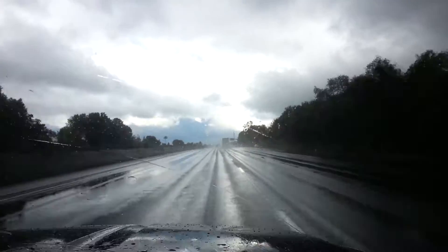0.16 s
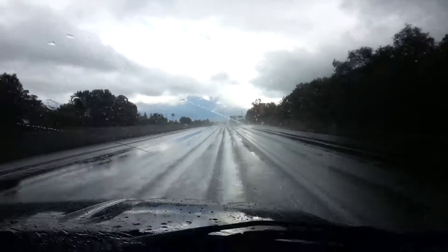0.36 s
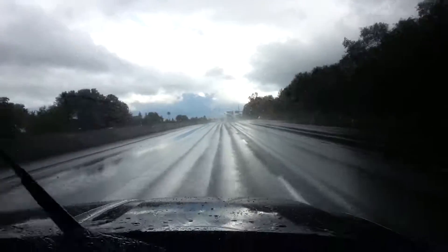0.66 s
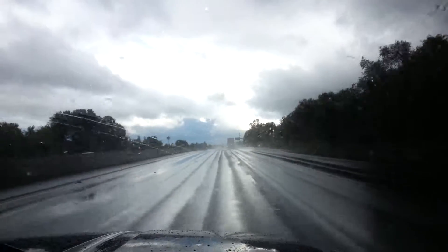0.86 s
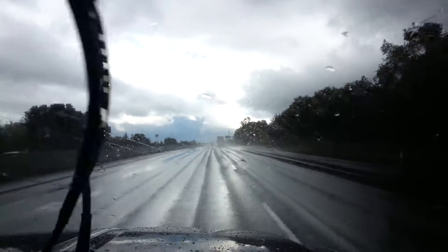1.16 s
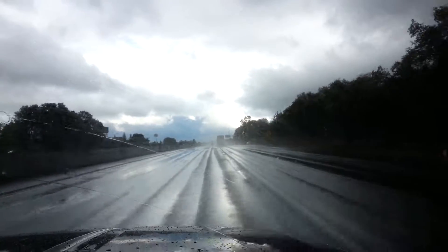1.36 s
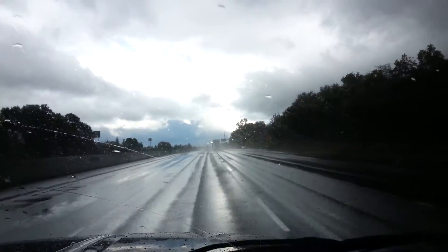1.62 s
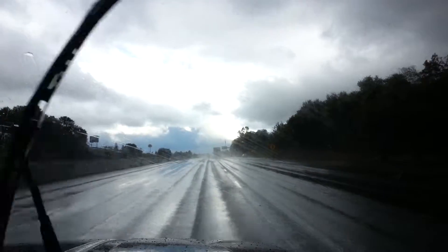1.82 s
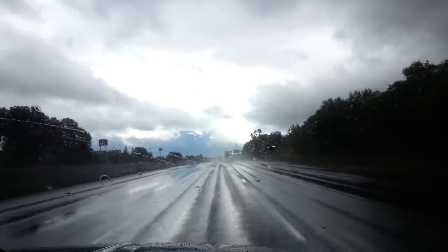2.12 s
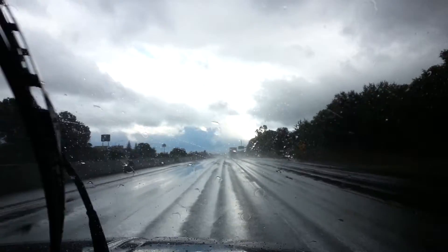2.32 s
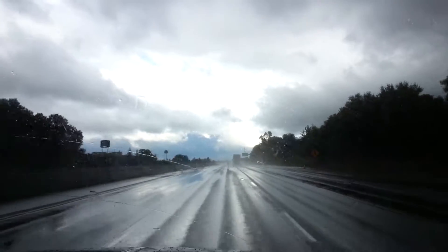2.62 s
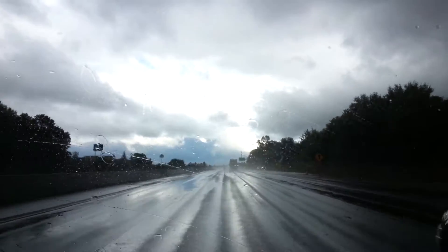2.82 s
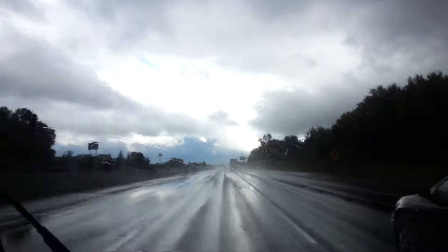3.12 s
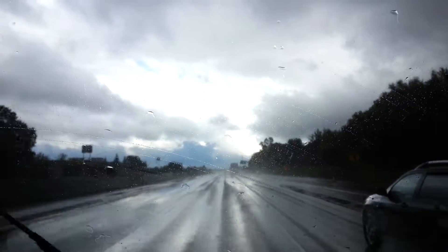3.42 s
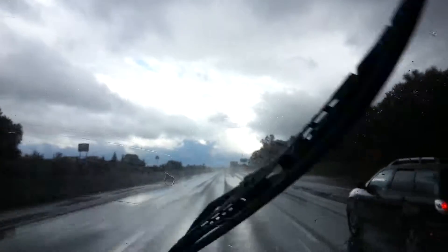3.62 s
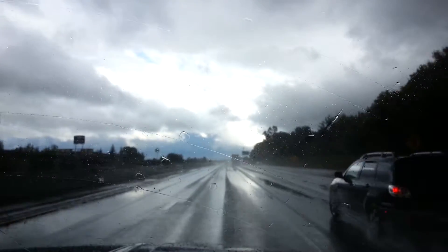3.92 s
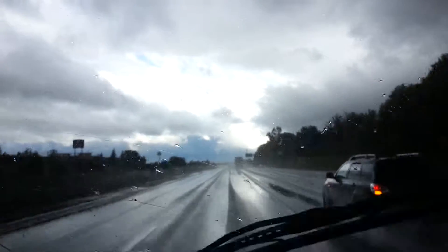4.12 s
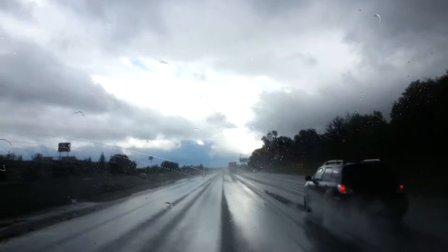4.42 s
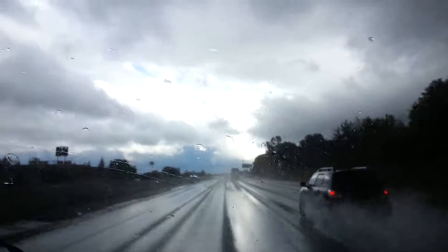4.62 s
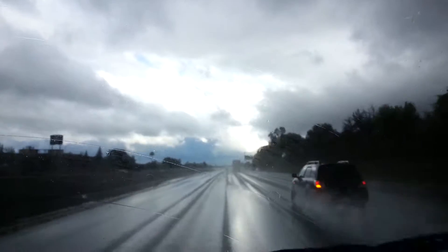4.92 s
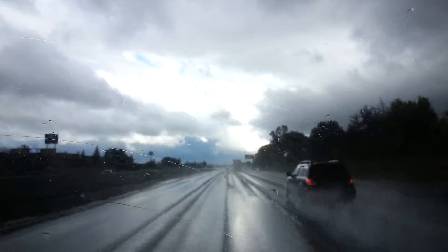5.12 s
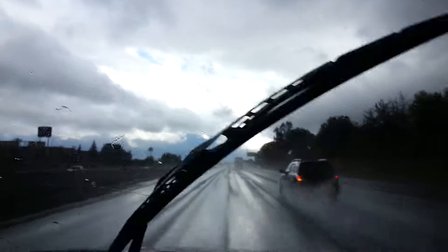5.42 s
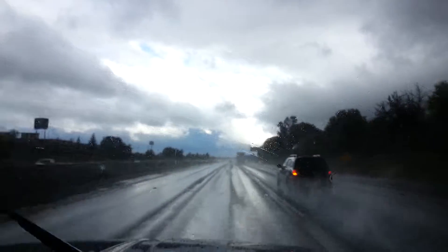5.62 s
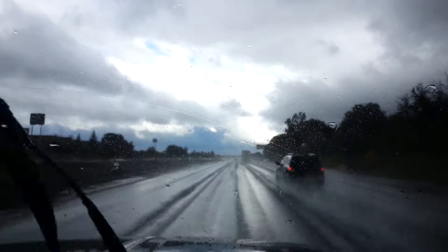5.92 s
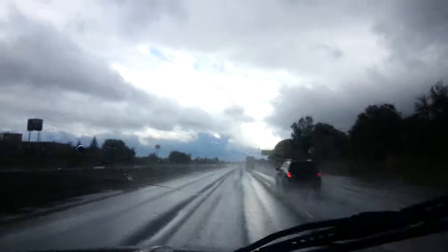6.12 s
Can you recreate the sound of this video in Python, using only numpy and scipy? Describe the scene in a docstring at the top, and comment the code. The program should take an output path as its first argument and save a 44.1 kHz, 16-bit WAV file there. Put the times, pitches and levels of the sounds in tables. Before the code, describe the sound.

A stereo microphone inside a truck cab faces the windshield at steady highway speed. Throughout, a low wet-road rumble, watery tyre wash and soft low engine hum roll evenly, swelling briefly near 1.4 and more gently around 2 and 4.2 seconds. Dense crisp rain patters on the glass with fine spray hiss, gusty during the first 2.5 seconds, then gradually easing, with a slight revival near 5.9. Faint high ticks sparkle above. Fat drops crack sharply, mostly left of centre, at scattered moments, the loudest at 5.2, another at 5.3. Wipers drag, flop and thud hollowly near 1.0, 2.2, 2.8, 3.4, 4.7, 5.3 and strongest at 5.9, shaking cowl and dashboard. A breathy tyre drone, clearest around 2 seconds and again near 3.9, glides slowly downward as a car draws past, fading under the roar until the end at about 6.3.

```python
"""Rain pelts the windshield of a truck cab at highway speed: dense patter shaped by the glass, over spray hiss.
Fat drops crack (noise snap plus ringing pane modes); sparse faint noise grains lie at 9.5 to 14.6 kHz.
Wipers thud at each turn: noise bursts slap the glass and ring the cowl and dashboard.
Behind: wet-road roar (coloured noise), a gliding tyre drone (narrow noise band), engine hum (sines)."""
import sys
import numpy as np
from scipy import signal
from scipy.fft import rfft, irfft, next_fast_len
from scipy.io import wavfile
from scipy.ndimage import uniform_filter1d

SR = 44100
rng = np.random.default_rng(int(sys.argv[2]) if len(sys.argv) > 2 else 0)


def store_pcm(level_fs):
    """Save levels as 16-bit WAV."""
    pcm = np.round(np.clip(level_fs, -1, 1) * 32767).astype(np.int16)
    wavfile.write(sys.argv[1], SR, np.atleast_2d(pcm).T)


N = 276066
TIME_S = np.arange(N) / SR
CUTOFF_HZ = 14600
ENGINE_FIRING_HZ = 112.24
RUMBLE_DB, WASH_DB = -23.5, -27
# wetter road, louder tyres: dB of roar per dB of rain
RUMBLE_DB_PER_RAIN_DB, WASH_DB_PER_RAIN_DB = 0.078, 0.013

# engine orders: multiple of firing rate, rms level/dB
ENGINE_ORDERS = [(1, -35), (2, -30), (3, -34)]
# roar swells over some stretches of road: centre t/s, half-length/s, rise/dB
ROAD_SWELLS = [(0.55, 0.19, 0.5), (1.364, 0.056, 3.5), (2.034, 0.45, 1.5), (2.725, 0.085, 0.3),
               (4.15, 0.15, 1.0), (5.5, 0.07, 1.1)]
# body rumble, relative spectrum: f/Hz, level/dB per Hz
RUMBLE_SPECTRUM = [(20, -69), (32, -36), (48, -20), (75, -7), (105, -6.5), (137, -1), (155, -2.6),
                   (185, 0.7), (250, -2.5), (280, 0), (320, -4.5), (380, -8), (520, -19), (900, -65)]
# water thrown by the tyres, relative spectrum: f/Hz, level/dB per Hz
WASH_SPECTRUM = [(200, -17), (400, -2.5), (560, -3.5), (700, -6), (770, -3.5), (880, -9), (1000, -12),
                 (1200, -10), (1500, -14.5), (2200, -20), (4500, -21), (6000, -34.5), (15000, -91)]
# likeness of cab noise at the two microphones: f/Hz, correlation
MIC_CORRELATION = [(60, 0.93), (160, 0.98), (280, 0.76), (480, 0.72), (640, 0.02), (1100, 0.092),
                   (1450, -0.62), (2000, -0.26), (2700, 0.49), (4000, -0.15)]
# tyre drone sinking in pitch as a car draws past: t/s, f/Hz, rms level/dB
DRONE_GLIDE = [(0, 634, -49), (0.5, 623, -36.5), (0.9, 611, -47), (1.35, 594, -36), (2.0, 589.5, -32.5),
               (2.5, 577.5, -40.5), (3.2, 554.3, -40.5), (3.9, 528.3, -35.5), (5.0, 509, -46),
               (6.26, 502, -45)]
# wiper turns: t/s, cowl boom level/dB, dashboard knock level/dB, slap level before FLOP_STAGES/dB
WIPER_TURNS = [(0.986, -20.5, -28, -38), (2.211, -16.5, -23, -31), (2.755, -22.5, -27, -44),
               (3.436, -18, -18, -34), (4.654, -20, -21, -29), (5.255, -22.5, -27, -34),
               (5.868, -13, -23.5, -27.5)]
# drag, flop, rebound of a blade: t from flop/s, level/dB, half-length/s
FLOP_STAGES = [(-0.024, -12.5, 0.036), (0, 2.5, 0.013), (0.05, -9.5, 0.016)]
# modes of the cowl under the wipers: f/Hz, level/dB, t60/s
COWL_MODES = [(125, -8, 0.23), (193.3, 8, 0.2), (223.3, 2.5, 0.21), (283.6, 4.5, 0.21)]
# dashboard modes: f/Hz, level/dB, t60/s
DASHBOARD_MODES = [(331, 2, 0.051), (421.5, -1, 0.095), (501, -10, 0.073)]
# rubber slap on wet glass, relative spectrum: f/Hz, level/dB per Hz
SLAP_SPECTRUM = [(400, -12), (700, -8), (830, 10), (920, -10), (1140, 2), (1300, -6), (1800, -8),
                 (3000, -7), (6000, -17), (14000, -44)]
# fat drops: t/s, rms level over first 12 ms/dB, favoured f/Hz, fall to either side/dB per octave,
# left minus right/dB
FAT_DROPS = [(0.088, -33, 4200, 12, 6), (0.4105, -31, 4200, 4, 8), (1.4172, -30, 3500, 6, 9),
             (1.603, -27.5, 4510, -2, 5), (1.863, -32, 4200, 9, 4), (2.0585, -29, 3500, 11, 0),
             (2.619, -33.5, 4200, 0, 3), (3.153, -31, 2650, 4, 7), (3.1845, -36, 5500, 6, 7),
             (3.804, -33, 4200, 5, 7), (3.9325, -32.5, 4620, 7, 9), (3.959, -32, 4000, 7, 5),
             (4.128, -30.5, 3970, 6, 3), (5.193, -19.5, 4800, 0, 3), (5.3256, -25, 2300, 8, 4),
             (5.3385, -34, 3490, 4, 4), (5.638, -29, 4100, 27, 5), (6.1133, -34, 4200, 3, 6)]
# windshield modes: f/Hz, level/dB, t60/s
PANE_MODES = [(1950, -6, 0.0071), (2320, 2.5, 0.0082), (2890, 4, 0.0068), (3970, -2, 0.004),
              (4640, 4, 0.0053)]
# snap of a bursting drop, relative spectrum: f/Hz, level/dB per Hz
SNAP_SPECTRUM = [(500, -9), (1500, -7), (2600, 4), (3900, 5), (5000, 6), (8000, 0), (13000, 8)]
# shower strength on the glass, gusts then easing: t/s, patter level/dB
RAIN_LEVEL = [(0, -28), (0.25, -32), (0.45, -28.5), (1.0, -32.5), (1.4, -29.5), (1.75, -31.5), (2.1, -29),
              (2.6, -32.0), (3.35, -32), (3.7, -34), (5.0, -35.5), (5.85, -33), (6.26, -35.5)]
# windshield at the left microphone, relative spectrum: f/Hz, level/dB per Hz
GLASS_LEFT = [(300, -5), (1000, -6.5), (1600, -2.5), (2050, -2), (2450, 0.5), (3800, 2.5), (4850, 4),
              (5400, -5), (6100, -10.5), (8000, -14), (9400, -17), (10600, -25), (14500, -27)]
# windshield at the right microphone, relative spectrum: f/Hz, level/dB per Hz
GLASS_RIGHT = [(300, -11.5), (1000, -1.5), (1600, -9), (2050, -8), (2500, -3.5), (3800, -5.5), (4800, -10),
               (5800, -12), (8000, -11.5), (10000, -15.5), (12000, -20.5), (14500, -28)]


def from_db(db):
    """dB to amplitude ratio."""
    return 10 ** (np.asarray(db) / 20)


def rms_one(x):
    """Scales the whole array to rms 1."""
    return x / np.sqrt(np.mean(x ** 2) + 1e-20)


def in_time(rows):
    """Interpolates each column of a time table at every sample."""
    knots_s, *columns = np.transpose(rows)
    return [np.interp(TIME_S, knots_s, column) for column in columns]


def on_bins(points, size):
    """Reads a table over log frequency at the bins of an FFT."""
    hz, value = np.transpose(points)
    bins_hz = np.fft.rfftfreq(size, 1 / SR)
    return np.interp(np.log(bins_hz + 1), np.log(hz), value)


def colour(x, spectrum):
    """Causal minimum-phase filter with the given spectrum, by folding the cepstrum."""
    size = 2 * next_fast_len(x.shape[-1] // 2 + 4096)
    cepstrum = irfft(np.log(from_db(on_bins(spectrum, size))))
    cepstrum[1:size // 2] *= 2
    cepstrum[size // 2 + 1:] = 0
    response = np.exp(rfft(cepstrum))
    return irfft(rfft(x, size) * response)[..., :x.shape[-1]]


def drift(knots_per_s):
    """Slow random curve, rms 1."""
    knots = rng.standard_normal(2000)
    return rms_one(np.interp(TIME_S * knots_per_s, np.arange(len(knots)), knots))


def steady(x):
    """Evens a noise to rms 1 over each eighth of a second, so that it rolls without lumps."""
    return x / np.sqrt(uniform_filter1d(np.mean(x ** 2, axis=0), size=SR // 8))


def ring(force, hz, t60_s):
    """One decaying mode, a two-pole resonator with gain 1 at its centre."""
    radius = np.exp(-np.log(1000) / (t60_s * SR))
    angle = 2 * np.pi * hz / SR
    poles = [1, -2 * radius * np.cos(angle), radius ** 2]
    return signal.lfilter([1, 0, -1], poles, force + 1e-18) * (1 - radius ** 2) / 2


def ring_modes(force, modes):
    """Sum of a body's modes, each brought to its own level."""
    return sum(from_db(db) * rms_one(ring(force, hz, t60_s)) for hz, db, t60_s in modes)


def shaken(force, modes):
    """A panel rings with its modes; rms 1 over its loudest 1024 samples."""
    sound = ring_modes(force, modes)
    return sound / np.sqrt(uniform_filter1d(np.mean(sound ** 2, axis=0), size=1024).max())


def cab_noise(spectrum):
    """Diffuse stereo noise whose channel correlation varies with frequency; rms 1."""
    size = 2 * next_fast_len(N // 2 + 1)
    mid, side = rfft(rng.standard_normal((2, size)))
    alike = np.clip(on_bins(MIC_CORRELATION, size), -.99, .99)
    pair = np.sqrt(1 + alike) * mid + np.sqrt(1 - alike) * side * [[1], [-1]]
    return rms_one(colour(irfft(pair)[:, :N], spectrum))


def splat(crack_s, tail_db, tail_s, lag_s):
    """A sharp noise crack, one microphone lagging by lag_s, plus scattered cab echoes; energy 1 each."""
    t = TIME_S[:SR // 25]
    crack = rng.standard_normal(len(t)) * np.exp(-t / crack_s)
    # positive lag delays the left, negative the right
    direct = np.array([np.interp(t - max(side * lag_s, 0), t, crack, left=0) for side in (1, -1)])
    echoes = rng.standard_normal((2, len(t))) * np.exp(-t / tail_s)
    both = direct + from_db(tail_db) * echoes
    return both / np.sqrt(np.sum(both ** 2, axis=1, keepdims=True))


def through_glass(x):
    """The windshield colours the sound differently at each microphone."""
    return np.array([colour(x[0], GLASS_LEFT), colour(x[1], GLASS_RIGHT)])


def engine(waver_db=1.93, wander_rad=0.68):
    """Steady cruise: low firing orders as sines, wavering in level and phase."""
    phase = 2 * np.pi * ENGINE_FIRING_HZ * TIME_S
    hum = 0
    for order, level_db in ENGINE_ORDERS:
        amplitude = np.sqrt(2) * from_db(level_db + waver_db * drift(9))
        hum = hum + amplitude * np.sin(order * phase + wander_rad * drift(12))
    return hum


def road(sway_db=0.7, sway_knots_per_s=8):
    """The body rumbles over asphalt, tyres throw water; both rise slightly with the rain."""
    rain_db, = in_time(RAIN_LEVEL)
    wet_db = rain_db - rain_db.mean()
    swell_db = sum(rise_db * np.exp(-((TIME_S - s) / half_s) ** 2) for s, half_s, rise_db in ROAD_SWELLS)
    sway = sway_db * drift(sway_knots_per_s)
    rumble_db = RUMBLE_DB + RUMBLE_DB_PER_RAIN_DB * wet_db + swell_db + sway
    wash_db = WASH_DB + WASH_DB_PER_RAIN_DB * wet_db + swell_db
    rumble = from_db(rumble_db) * steady(cab_noise(RUMBLE_SPECTRUM))
    wash = from_db(wash_db) * steady(cab_noise(WASH_SPECTRUM))
    return rumble + wash


def drone(width_hz=110, apart_db=-3):
    """Tyre tread sings: a narrow noise band shifted to a gliding pitch."""
    pitch_hz, level_db = in_time(DRONE_GLIDE)
    shared, left, right = rng.standard_normal((3, N)) + 1j * rng.standard_normal((3, N))
    noise = shared + from_db(apart_db) * np.array([left, right])
    lowpass = signal.butter(2, width_hz / 2, fs=SR, output="sos")
    band = signal.sosfilt(lowpass, noise)
    carrier = np.exp(2j * np.pi * np.cumsum(pitch_hz) / SR)
    return from_db(level_db) * steady(np.real(band * carrier))


def treble_grains(per_s=22, level_db=-62, spread_db=4, above_hz=9500):
    """Sparse faint high-band noise grains at random times, 9.5 to 14.6 kHz."""
    sizes = from_db(spread_db * np.clip(rng.standard_normal((2, N)), -2, 2))
    onsets = (rng.random(N) < per_s / SR) * sizes
    grain = splat(crack_s=0.0006, tail_db=-7, tail_s=0.0037, lag_s=0)
    grains = signal.oaconvolve(onsets, grain, axes=1)[:, :N]
    band = signal.butter(2, [above_hz, CUTOFF_HZ], "band", fs=SR, output="sos")
    return from_db(level_db) * rms_one(signal.sosfilt(band, grains))


def wipers(apart_db=-12, rubber_hz=600):
    """At each turn blades drag, flop, rebound: rubber slaps the glass, shakes cowl and dashboard."""
    out = np.zeros((2, N + SR))
    t = TIME_S[:SR // 2] - .1  # flop at 0
    rubber = signal.butter(2, rubber_hz, fs=SR, output="sos")
    contact = sum(from_db(db) * np.exp(-((t - s) / half_s) ** 2) for s, db, half_s in FLOP_STAGES)
    for s, boom_db, knock_db, slap_db in WIPER_TURNS:
        shake = rng.standard_normal(len(t)) + from_db(apart_db) * rng.standard_normal((2, len(t)))
        force = signal.sosfilt(rubber, shake * contact)
        boom = from_db(boom_db) * shaken(force, COWL_MODES)
        knock = from_db(knock_db) * shaken(force, DASHBOARD_MODES)
        hiss = rms_one(colour(rng.standard_normal((2, len(t))), SLAP_SPECTRUM))
        slap = from_db(slap_db) * contact * hiss
        start = round((s + t[0]) * SR)
        out[:, start:start + len(t)] += boom + knock + slap
    return out[:, :N]


def fat_drops(snap_db=-0.5, echoes_db=-15, echoes_s=0.0043):
    """Heavy drops snap and knock the pane; where one lands decides which modes it favours."""
    out = np.zeros((2, N + SR))
    t = TIME_S[:SR // 25]
    for s, level_db, pitch_hz, fall_db, pan_db in FAT_DROPS:
        snap = colour(splat(crack_s=0.0012, tail_db=-3, tail_s=0.0042, lag_s=0), SNAP_SPECTRUM)
        echoes = rng.standard_normal((2, len(t))) * np.exp(-t / echoes_s)
        blow = (t == 0) + from_db(echoes_db) * echoes
        knock = ring_modes(blow, PANE_MODES)
        spot = [(pitch_hz * 2. ** octave, -fall_db * abs(octave)) for octave in (-2, 0, 2)]
        hit = through_glass(colour(rms_one(knock) + from_db(snap_db) * rms_one(snap), spot))
        onset = hit[:, :round(.012 * SR)]
        hit = hit / np.sqrt(np.mean(onset ** 2, axis=1, keepdims=True))
        start = round(s * SR)
        out[:, start:start + len(t)] += from_db(level_db + pan_db * np.array([[.5], [-.5]])) * hit
    return out[:, :N]


def patter(per_s, spread_db, largest, flurry_db, spots=24):
    """Drops of all sizes land in flurries on spots across the glass, each with its own splat."""
    lands = rng.random(N) < per_s * from_db(flurry_db * drift(25)) / SR
    sizes = from_db(spread_db * np.minimum(rng.standard_normal(N), largest))
    spot = rng.integers(0, spots, N)
    out = np.zeros((2, N))
    for k, lag_s in enumerate(np.linspace(-.0004, .0004, spots)):
        response = splat(crack_s=0.00041, tail_db=-7.5, tail_s=0.0053, lag_s=lag_s)
        hits = lands * sizes * (spot == k)
        out += signal.oaconvolve(hits[None], response, axes=1)[:, :N]
    return rms_one(through_glass(out))


def rain(drops_per_s=2100, spray_db=-11):
    """Patter follows the shower in level and drop density; fine spray hisses between the drops."""
    level_db, = in_time(RAIN_LEVEL)
    density = from_db(level_db - level_db.mean())
    drops = patter(drops_per_s * density, spread_db=11.0, largest=1.9, flurry_db=2.04)
    # flurries even out over a fifth of a second
    evened = drops / np.sqrt(uniform_filter1d(np.mean(drops ** 2, axis=0), size=SR // 5))
    spray = rms_one(through_glass(rng.standard_normal((2, N))))
    return from_db(level_db) * (evened + from_db(spray_db) * spray)


def scene():
    """All layers as heard from behind the windshield."""
    return engine() + road() + drone() + treble_grains() + wipers() + fat_drops() + rain()


def record(dry):
    """The microphones shed the deepest rumble; the top is cut steeply."""
    highpass = signal.butter(4, 40, "high", fs=SR, output="sos")
    lowpass = signal.ellip(10, .2, 80, CUTOFF_HZ, fs=SR, output="sos")
    return signal.sosfilt(lowpass, signal.sosfilt(highpass, dry))


dry = scene()
out = record(dry)
store_pcm(out)
```